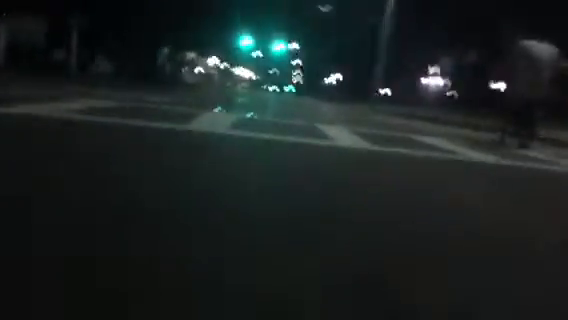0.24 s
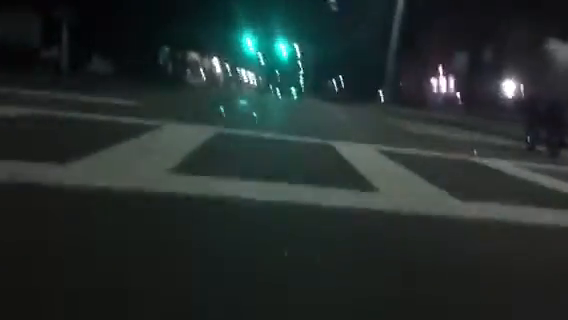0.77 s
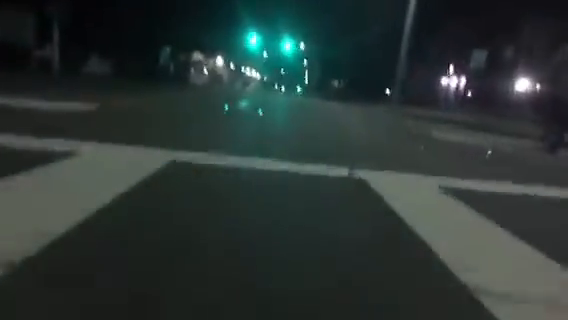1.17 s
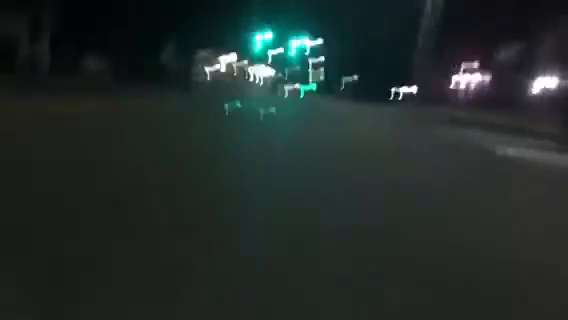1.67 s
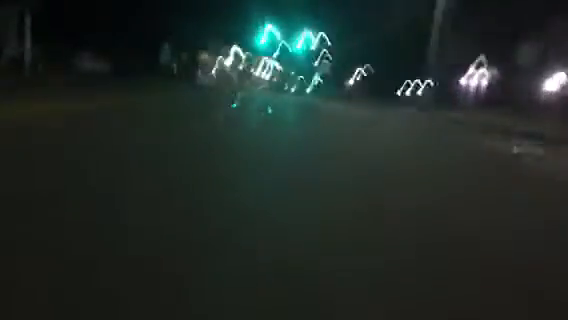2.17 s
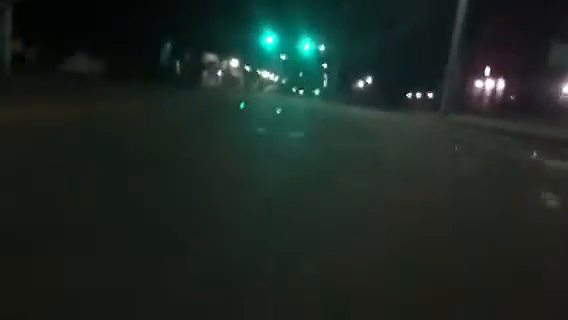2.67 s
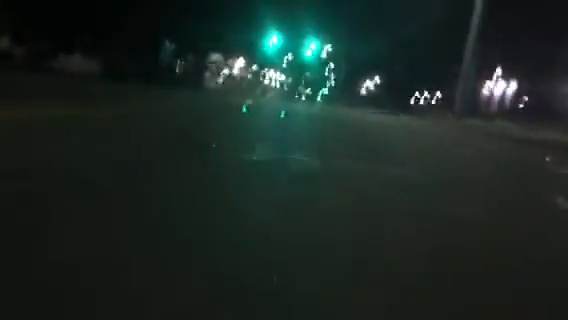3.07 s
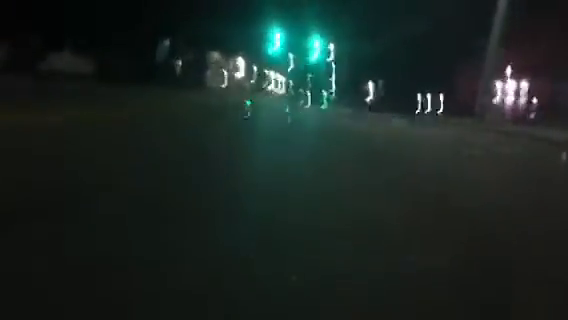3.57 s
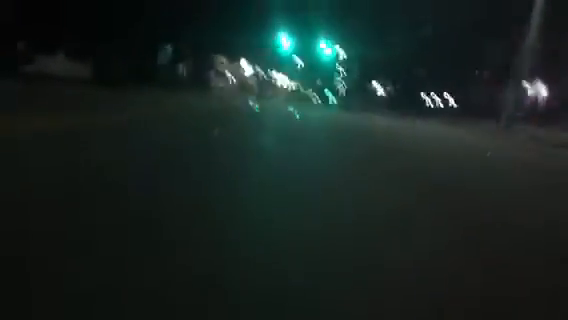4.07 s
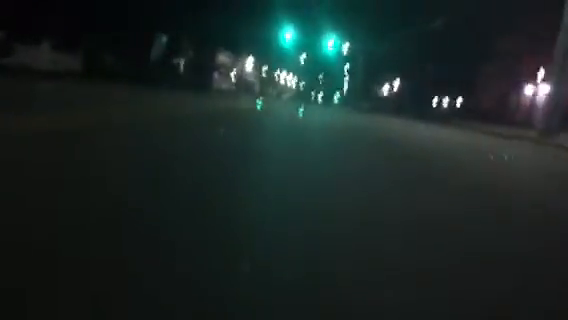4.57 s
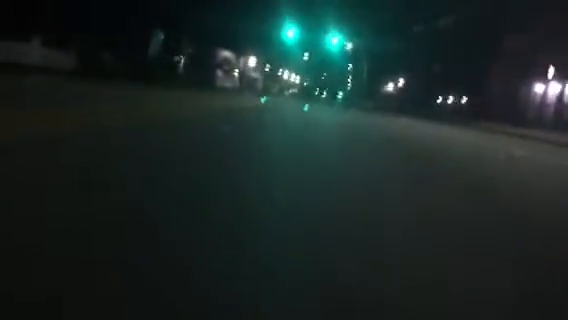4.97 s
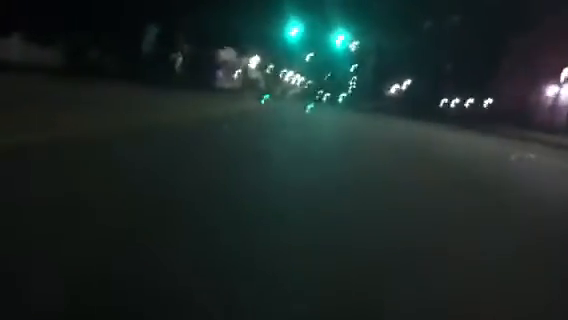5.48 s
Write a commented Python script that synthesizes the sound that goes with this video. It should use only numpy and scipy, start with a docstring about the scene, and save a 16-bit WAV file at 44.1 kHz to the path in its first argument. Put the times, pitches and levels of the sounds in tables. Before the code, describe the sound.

A powered wheelchair drives quickly over rough asphalt, heard close up from its own frame in the open air. The motor whines steadily above a low rumble, with small thuds and ticking fittings. About a second and a half in, the tyres crunch on grit and hard parts knock sharply in two clusters. The rolling noise dips, swells back, and a few more stones snap later on.

```python
"""A powered wheelchair driving fast along a road in the open air, the microphone riding on its frame.
From the start the drive whines on two gear orders while rough asphalt rumbles and keeps the frame
ringing. A joint squeaks twice; bumps thud and loose fittings tick all along the way. About 1.5 s in,
over a crosswalk, the tyres crunch on grit and hard parts knock. After the knocks the rolling noise
drops, then swells back over about a second. A few more stones snap just after 4 s."""
import sys
import numpy as np
from scipy import signal
from scipy.fft import rfft, irfft
from scipy.io import wavfile

SR = 44100
rng = np.random.default_rng(int(sys.argv[2]) if len(sys.argv) > 2 else 0)


def digitize_waveform(pressure):
    """Quantize a signal to 16-bit integers and store it at the path in sys.argv[1].

    Rows of a 2-D input are taken as channels; values are limited to [-1, 1].
    """
    field = np.atleast_2d(pressure).T
    bounded = np.clip(field, -1, 1)
    quanta = np.round(bounded * 32767).astype(np.int16)
    wavfile.write(sys.argv[1], SR, quanta)


N = 253134
TIME = np.arange(N) / SR

# Loudness of the rolling noise. Each row: time in seconds, relative level in dB.
ROLLING_LEVEL = [(0, 0.5), (.8, 0.5), (1.15, 0.5), (1.45, 5), (1.66, 7), (1.92, 0), (2.15, 5), (2.32, -5),
                 (2.65, -6), (3.3, -1.5), (3.7, 2.5), (3.98, -.5), (4.33, 5.5), (4.52, -2.5), (4.75, 2.5),
                 (5.05, 0), (5.74, 1.5)]
# The drone of gear tones and ringing frame. Each row: time in seconds, relative level in dB.
DRONE_LEVEL = [(0, 2), (.75, -1), (1.15, -3.5), (1.5, 0), (1.9, -5.5), (2.3, -16), (2.55, -3.5),
               (3.4, -0.5), (3.8, -2), (4.9, 2), (5.74, 2.5)]
# Modes of the loose fittings. Each row: frequency in Hz, level in dB, seconds to fall 60 dB.
FITTING_MODES = [(1275, -1.5, 0.018), (1650, -1.5, 0.011), (2150, -1.5, 0.0077), (3340, -1.5, 0.0057),
                 (3700, -10.5, 0.01), (4490, -7.5, 0.0088), (5960, -10.5, 0.0064), (7300, -19, 0.0013),
                 (8850, -18, 0.0038), (12100, -31.5, 0.0033)]
# Modes of the chair's hollow body. Each row: frequency in Hz, level in dB, seconds to fall 60 dB.
BODY_MODES = [(316.6, -3, 0.068), (500, -1, 0.043), (624, -5.5, 0.046), (790, -10.5, 0.017)]


def amp(db):
    """Decibels to gain."""
    return 10 ** (np.asarray(db) / 20)


def unit(x):
    """Scales to an rms of 1."""
    return x / np.sqrt(np.mean(x ** 2) + 1e-20)


def curve(table):
    """A table of times and values, sample by sample."""
    return np.interp(TIME, *np.transpose(table))


def add(mix, s, sound):
    """Mixes a sound in at s seconds."""
    part = mix[max(round(s * SR), 0):][:len(sound)]
    part += sound[:len(part)]


def colour(x, spectrum):
    """Filters x by rows of Hz and dB, to an rms of 1."""
    hz, db = np.transpose(spectrum)
    bins = np.fft.rfftfreq(len(x), 1 / SR)
    gain = amp(np.interp(np.log(bins + 1), np.log(hz), db))
    return unit(irfft(rfft(x) * gain, len(x)))


def wander(rate_hz):
    """Random drift up to about the given rate, rms 1."""
    bins = np.fft.rfftfreq(N, 1 / SR)
    return unit(irfft(rfft(rng.standard_normal(N)) * np.exp(-(bins / rate_hz) ** 2), N))


def clicks(per_s, spread_db):
    """A random train of clicks, mostly small and a few large."""
    size = amp(spread_db * np.minimum(rng.exponential(1, N), 4))
    return unit(size * rng.choice([-1, 1], N) * (rng.random(N) < per_s / SR))


def treble_shelf(hz):
    """Rises from 0 to 1 over the octave above 2600 Hz."""
    return np.clip(np.log2(hz / 2600), 0, 1)


def ring(modes, treble_db=0, scatter=.06, uneven_db=3.5):
    """One blow on a set of modes, peak 1; each blow lands on a slightly different spot."""
    t = np.arange(4096) / SR
    out = np.zeros(len(t))
    for hz, db, t60 in modes:
        strength_db = db + treble_db * treble_shelf(hz) + uneven_db * rng.standard_normal()
        detune, sign = rng.uniform(-1, 1), rng.choice([-1, 1])
        cycles = hz * (1 + scatter * detune) * t
        envelope = amp(strength_db - 60 * t / t60) * (1 - np.exp(-cycles))
        out += sign * envelope * np.sin(2 * np.pi * cycles)
    return out / abs(out).max()


def chatter(blow, bounce, settle_s):
    """A loose part strikes once, then buzzes briefly against its seat; peak 1."""
    t = np.arange(1200) / SR
    contact = bounce * rng.standard_normal(len(t)) * np.exp(-t / settle_s)
    contact[0] = 1
    tick = signal.fftconvolve(blow, contact)
    return tick / abs(tick).max()


def snap(decay_s, treble_db):
    """A dry broadband crack, peak 1."""
    # The crack's spectrum. Each row: frequency in Hz, relative level in dB.
    spectrum = [(500, -20), (1000, -6.5), (1500, 4.5), (3400, -10.5), (6000, -7.5), (9500, -20),
                (12500, -23.5), (16000, -35.5)]
    tilted = [(hz, db + treble_db * treble_shelf(hz)) for hz, db in spectrum]
    t = np.arange(4096) / SR
    envelope = np.exp(-t / decay_s) * (1 - np.exp(-t * SR / 10))
    crack = colour(rng.standard_normal(len(t)), tilted) * envelope
    return crack / abs(crack).max()


def motor(low_tone_db=-23.5, high_tone_db=-22.5):
    """The gears whine at the third and fifth shaft orders; road load shakes their strength and timing."""
    # The motor shaft. Each row: time in seconds, speed in turns per second.
    shaft_speed = [(0, 68.2), (1.2, 68.9), (2.25, 68.5), (2.6, 69.0), (4.7, 68.6), (5.2, 68.2),
                   (5.74, 68.3)]
    drone_db = curve(DRONE_LEVEL)
    turns = np.cumsum(curve(shaft_speed)) / SR + .009 * wander(rate_hz=13)
    low, high = np.sin(2 * np.pi * 3 * turns), np.sin(2 * np.pi * 5 * turns)
    low_db = low_tone_db + drone_db + 2.7 * wander(rate_hz=16)
    high_db = high_tone_db + .6 * drone_db + shudder_db() + 2.6 * wander(rate_hz=16)
    return low * amp(low_db) + high * amp(high_db)


def shudder_db(half_length_s=.025):
    """The frame shudders: brief bell-shaped swells of its ringing and of the upper gear tone."""
    # Each row: middle of a swell in seconds, relative height in dB.
    shudders = [(1.13, 8.5), (1.3, 9.5), (1.68, 8.5), (2.17, 11), (2.808, 10.5), (3.012, 5), (3.159, 7),
                (3.771, 7), (4.349, 5.5), (5.148, 8)]
    return sum(db * np.exp(-((TIME - s) / half_length_s) ** 2) for s, db in shudders)


def rolling(rumble_db=-26, frame_db=-24, tyre_db=-51):
    """Asphalt grain shakes the chassis, rings the frame and hisses under the tread."""
    # Spectra of chassis, frame and tyres. Each row: frequency in Hz, relative level in dB.
    rumble_spectrum = [(12, -39), (24, -22), (35, -6), (55, 5), (80, 1.5), (130, 4), (190, 0), (240, -2.5),
                       (285, -9), (450, -16), (620, -23), (800, -32.5), (1200, -52), (4000, -91)]
    frame_spectrum = [(200, -49), (290, -20.5), (325, -10.5), (358, 1), (388, -4), (412, -9), (445, -22.5),
                      (520, -35.5), (900, -53), (3000, -100)]
    tyre_spectrum = [(300, -14.5), (600, 11.5), (1000, 0.5), (1300, 2.5), (1650, 2.5), (2300, -7),
                     (2900, -9.5), (3600, -10.5), (4600, -14), (6000, -11.5), (7600, -20), (9600, -19.5),
                     (11500, -30), (16000, -40.5)]
    rolling_db = curve(ROLLING_LEVEL)
    jolt = wander(rate_hz=40)  # rough patches drive all three layers together
    rumble = colour(rng.standard_normal(N), rumble_spectrum) * amp(rumble_db + rolling_db + 3.9 * jolt)
    ringing_db = frame_db + .39 * curve(DRONE_LEVEL) + .75 * shudder_db() + 2.1 * jolt
    frame = colour(rng.standard_normal(N), frame_spectrum) * amp(ringing_db)
    tread = panels(rng.standard_normal(N) + .44 * clicks(per_s=900, spread_db=9))
    hiss = colour(tread, tyre_spectrum) * amp(tyre_db + .67 * rolling_db + 1.6 * jolt)
    return rumble + frame + hiss


def panels(x, t60_s=.05):
    """The chair's panels and tubes add many close, short-lived resonances."""
    t = np.arange(2048) / SR
    tail = rng.standard_normal(len(t)) * amp(-60 * t / t60_s)
    return x + amp(-8) * signal.oaconvolve(x, tail / np.linalg.norm(tail))[:N]


def rattle(level_db=-46, spread_db=2, count=190):
    """Fittings rattle faintly at random, each with its own colour, swelling with the rolling noise."""
    out = np.zeros(N)
    for when, size in rng.random((count, 2)):
        blow = ring(FITTING_MODES, treble_db=4, scatter=.12, uneven_db=1)
        gain = amp(-spread_db * np.log(size + .024))
        add(out, when * N / SR, gain * chatter(blow, bounce=.28, settle_s=.0072))
    return out * amp(level_db + .81 * curve(ROLLING_LEVEL))


def squeaks(pitch_hz=4760, length_s=.015, jitter=.27):
    """A joint sticks and slips as the frame flexes: one unsteady high tone and its octave."""
    # Each row: start in seconds, level in dB.
    slips = [(0.13, -52), (0.195, -50)]
    out, t = np.zeros(N), np.arange(0, length_s, 1 / SR)
    for s, db in slips:
        hz = pitch_hz * (1 + jitter * rng.standard_normal(N)[:len(t)])
        phase = 2 * np.pi * np.cumsum(hz) / SR
        add(out, s, amp(db) * np.hanning(len(t)) * (np.sin(phase) + np.sin(2 * phase)))
    return out


def bumps(thud_gain_db=-.5, clonk_gain_db=3, tyre_lag_s=.00778):
    """Each bump or seam in the road clonks on contact; the middle of its thud comes just after."""
    # Each row: contact in seconds, then relative levels in dB of quick swing, slow sway and clonk.
    seams = [(.134, -3.5, -19, -26), (0.356, -7, -7.5, -25), (0.494, -14, -15, -26),
             (.604, -6.5, -11.5, -23.5), (0.725, -13, -9.5, -43), (0.794, -6.5, -21, -28),
             (0.835, -11.5, -11.5, -37), (0.933, -21, -10, -33.5), (1.308, -10, -14, -25),
             (1.388, -8, -13, -21.5), (1.56, -3, -7, -20.5), (1.599, -8, -8.5, -26.5),
             (1.655, -3, -1.5, -15.5), (1.703, -6.5, -8, -38), (1.8, 0, -5, -17), (1.999, -8, -8.5, -24.5),
             (2.041, -6.5, -13.5, -41), (2.145, -7, -4.5, -33), (2.175, -4, -15, -12),
             (2.392, -20, -19.5, -32), (2.455, -19, -24, -29.5), (3.043, -7.5, -16.5, -27.5),
             (3.54, -12, -31, -25.5), (3.618, -7.5, -9.5, -28.5), (3.702, -6, -17, -29),
             (3.779, -2.5, -7, -20), (3.865, -11, -11, -26.5), (4.173, -4, -11, -20.5),
             (4.254, -3, -5.5, -20.5)]
    out = np.zeros(N)
    for s, swing_db, sway_db, clonk_db in seams + small_bumps():
        jolt = thud(swing_db, sway_db)
        add(out, s, amp(clonk_db + clonk_gain_db) * clonk())
        add(out, s + tyre_lag_s - len(jolt) / 2 / SR, amp(thud_gain_db) * jolt)
    return out


def small_bumps(swing_db=-16, sway_db=-25, clonk_db=-35, spread_db=4, count=24):
    """Rows for lesser bumps, scattered along the way and stronger where the rolling noise is loud."""
    when, size = rng.random((count, 2)).T
    s = (np.arange(count) + when) / count * N / SR
    db = np.interp(s, TIME, curve(ROLLING_LEVEL)) + spread_db * (size - .5)
    return list(zip(s, swing_db + db, sway_db + db, clonk_db + db))


def clonk(fittings_db=-14):
    """A bump drums the hollow body and the fittings buzz along."""
    body = ring(BODY_MODES, scatter=.072)
    buzz = chatter(ring(FITTING_MODES, treble_db=-10, scatter=.089), bounce=.43, settle_s=.005)
    return body + amp(fittings_db) * buzz[:len(body)]


def thud(swing_db, sway_db, mid_swing_hz=161.4, mid_sway_hz=77.4, sway_s=.0098):
    """The tyres soften a bump into one or two swings, over a slower sway of the whole chair."""
    t = np.arange(-2000, 2000) / SR
    swing_phase, sway_phase, steepness, load = rng.random(4)
    swing_hz = mid_swing_hz * 2 ** (.86 * (steepness - .5))
    sway_hz = mid_sway_hz * 2 ** (.68 * (load - .5))  # depends on how the weight lands
    swing = np.sin(2 * np.pi * (swing_hz * t + swing_phase)) * np.exp(-(1.21 * t * swing_hz) ** 2)
    sway = np.sin(2 * np.pi * (sway_hz * t + sway_phase)) * np.exp(-.5 * (t / sway_s) ** 2)
    return amp(swing_db) * swing + amp(sway_db) * sway


def ticks(snap_db=4, buzz_db=-2):
    """The louder rattles of the loose fittings: a dry snap, then a short buzz that carries the treble."""
    # Each row: start in seconds, relative level in dB, relative treble in dB.
    strikes = [(0.136, -44, -14), (0.466, -27.5, -24), (0.5845, -31, -16), (.7941, -29.5, -23),
               (0.8238, -36.5, -18), (0.931, -28.5, -23), (1.2985, -37.5, -14), (1.4727, -30.5, -27),
               (1.762, -34, -12), (1.85, -32, 0), (2.055, -38, -27), (2.1188, -25, -35), (2.6, -34.5, -5),
               (3.3055, -35, -5), (3.391, -36, -6), (4.2282, -35.5, -34), (4.2502, -31, -15),
               (4.339, -38.5, 0), (4.6033, -39.5, -25), (4.6832, -40, -7), (5.2535, -41.5, -16)]
    out = np.zeros(N)
    for s, db, bright_db in strikes:
        add(out, s, amp(db + snap_db) * snap(decay_s=.0018, treble_db=.5 * bright_db + 3))
        blow = ring(FITTING_MODES, treble_db=bright_db + 15, scatter=.042, uneven_db=.5)
        add(out, s, amp(db + buzz_db) * chatter(blow, bounce=.2, settle_s=.0083))
    return out


def pebbles(level_db=-45, spread_db=3, count=22):
    """Stray pebbles click off the tread now and then, following the level of the rolling noise."""
    out = np.zeros(N)
    for when, size in rng.random((count, 2)):
        gain = amp(-spread_db * np.log(size + .09))
        add(out, when * N / SR, gain * snap(decay_s=.00077, treble_db=4))
    return out * amp(level_db + curve(ROLLING_LEVEL))


def grit():
    """The tyres crush patches of small stones; the larger ones snap singly."""
    # Each row: thickest moment in seconds, relative level in dB, rise and fall in dB per second.
    patches = [(1.655, -31.5, 144, 300), (1.795, -38, 302, 453), (2.18, -21, 543, 1200),
               (2.228, -35, 800, 803), (4.26, -45, 1102, 1098)]
    # Each row: frequency in Hz, relative level in dB.
    crunch_spectrum = [(400, -25), (700, 4), (1100, -6.5), (1650, -1), (2100, -7.5), (4400, -12),
                       (5900, -11.5), (7600, -24), (9500, -18.5), (12000, -36), (16000, -47)]
    # Each row: start in seconds, peak level in dB.
    large_stones = [(1.493, -32), (1.574, -20.5), (1.607, -27), (1.626, -26), (1.668, -21), (2.599, -44),
                    (4.229, -36), (4.263, -23.5), (4.269, -19.5), (4.605, -38)]
    thickness = sum(amp(db - np.maximum(rise * (s - TIME), fall * (TIME - s)))
                    for s, db, rise, fall in patches)
    grains = rng.standard_normal(N) + .86 * clicks(per_s=270, spread_db=2.5)
    clumps = amp(3.5 * wander(rate_hz=65))
    out = colour(grains, crunch_spectrum) * thickness * clumps * amp(-4.5)
    for s, db in large_stones:
        add(out, s, amp(db) * snap(decay_s=.0009, treble_db=11))
    return out


def knocks():
    """Hard parts collide: a short crack, the struck part's own ring and the hollow body under it."""
    # Each row: start in seconds, level in dB, main ring in Hz, relative treble and body in dB.
    hits = [(1.786, -5, 1630, -4.5, -20), (1.804, -19.5, 1850, 6, -10), (2.1385, -8.5, 1580, -2, -29),
            (2.1451, -11, 1830, 1, -5), (2.165, -12, 1280, -14, 7), (2.1754, -14, 1210, 9, 3),
            (2.187, -11.5, 1280, -2, 2), (2.196, -11, 1400, -4, -5), (2.2499, -6, 2030, -4, -13)]
    # Each row: multiple of the main ring, level in dB, seconds to fall 60 dB.
    part_modes = [(.8, -8, .008), (1, 0, .009), (1.8, -3, .006), (2.6, -12, .004), (4, -12, .0035),
                  (4.95, -12, .003), (5.75, -14, .003)]
    out = np.zeros(N)
    for s, db, hz, treble_db, body_db in hits:
        modes = [(hz * ratio, mode_db, t60) for ratio, mode_db, t60 in part_modes]
        blow = ring(modes, treble_db, scatter=.03, uneven_db=1)
        crack = .36 * snap(decay_s=.0007, treble_db=treble_db + 6)
        body = ring(BODY_MODES, scatter=.11, uneven_db=7.5)
        add(out, s, amp(db) * (blow + crack + amp(body_db) * body))
    return out


def scene():
    """Open air, close up: everything reaches the one microphone on the frame directly."""
    mix = motor() + rolling() + grit() + bumps() + ticks() + rattle() + pebbles() + knocks() + squeaks()
    return mix[None]


def record(dry, notch_hz=5080, notch_width_hz=600, notch_depth=.68, ceiling=.76, edge_hz=16000):
    """The microphone port hollows out a narrow band; peaks are rounded off and the top treble is cut."""
    port_band = signal.lfilter(*signal.iirpeak(notch_hz, notch_hz / notch_width_hz, SR), dry)
    heard = dry - notch_depth * port_band
    rounded = heard / (1 + (heard / ceiling) ** 4) ** (1 / 4)
    faded = rounded * signal.windows.tukey(N, .001)
    lowpass = signal.firwin(255, edge_hz, window=("kaiser", 9), fs=SR)
    return signal.oaconvolve(faded, lowpass[None], "same")


dry = scene()
out = record(dry)
digitize_waveform(out)
```